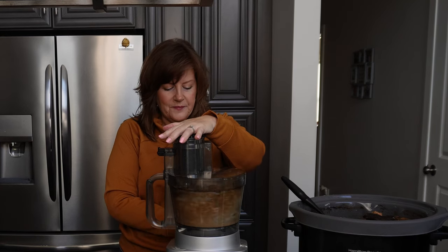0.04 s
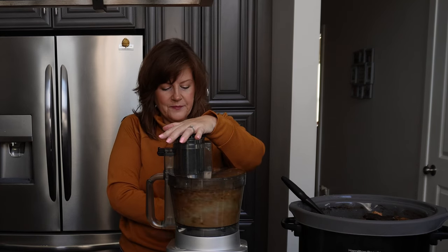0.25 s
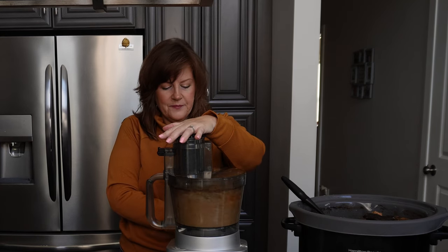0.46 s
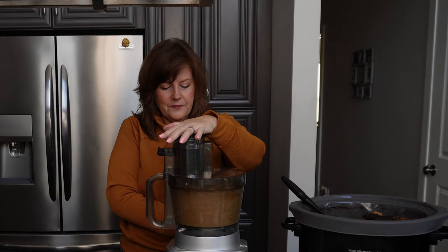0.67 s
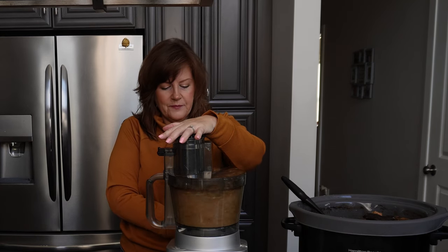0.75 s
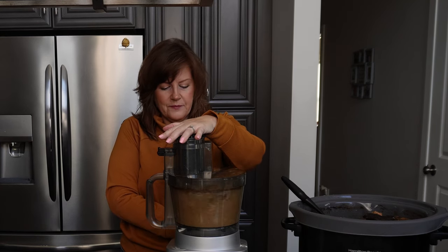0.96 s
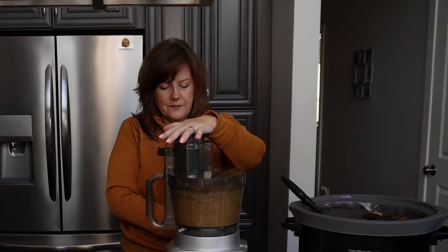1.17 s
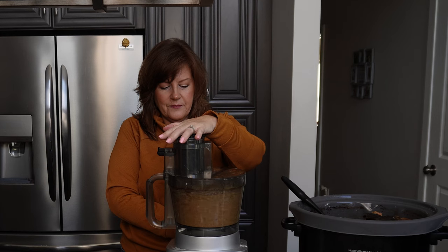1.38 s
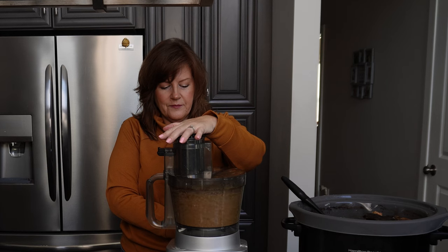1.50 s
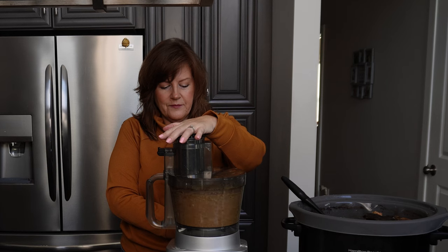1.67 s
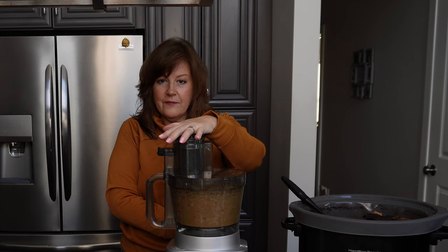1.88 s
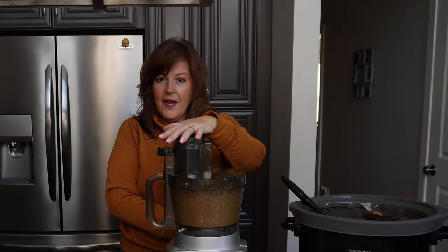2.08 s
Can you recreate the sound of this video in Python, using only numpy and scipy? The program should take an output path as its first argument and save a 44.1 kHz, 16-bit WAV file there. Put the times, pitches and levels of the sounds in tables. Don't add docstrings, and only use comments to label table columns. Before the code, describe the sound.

A food processor coasts faintly downward, then power comes on near 0.17 seconds with a low hum. Its gear whine climbs fast, loudest around 0.5 to 0.7, with rough rushing and rattling food. From then it slides down in pitch and fades, with brief singing tones and a thin bearing squeal. Near 2.05 comes a dull knock, then a bright switch tick at 2.09. Small hard-walled kitchen, fairly close.

```python
import sys
import numpy as np
from scipy import signal
from scipy.fft import rfft, irfft
from scipy.io import wavfile
from scipy.ndimage import uniform_filter1d

SR = 44100
rng = np.random.default_rng(int(sys.argv[2]) if len(sys.argv) > 2 else 0)


def volts(x):
    e = np.asarray(x, float) / 20
    return 10 ** e


def persist_wave(psi):
    counts = np.round(np.clip(psi, -1, 1) * 32767).astype(np.int16)
    wavfile.write(sys.argv[1], SR, np.atleast_2d(counts).T)


N = 94638
POWER_ON_S, HUM_END_S = .165, 1.75

# t/s, level/dB
DRIVE = [(0, -36), (.06, -40), (.15, -40), (.2, -34.5), (.3, -32), (.4, -28), (.5, -24.5), (.67, -25.5),
         (.82, -27.5), (.92, -29.5), (1.0, -30.5), (1.2, -35), (1.55, -40.5), (1.7, -44.5), (1.95, -53),
         (2.15, -53)]
# t/s, f/Hz
MESH_RATE = [
    (0, 895.3),
    (.165, 752.8),
    (.26, 1560),
    (.36, 2000),
    (.45, 2200),
    (.54, 2269),
    (.97, 1499),
    (1.52, 826.4),
    (2.04, 400),
    (2.15, 330),
]
# multiple of the mesh rate, level/dB
MESH_OVERTONES = [(1, -12.5), (2, -19), (3, -18), (4, -21), (5, -23), (6, -26)]
# f/Hz, level/dB (per Hz)
HOUSING_COLOUR = [(60, -51), (200, -23), (620, -21), (1300, -10), (2300, -7.5), (4700, -2), (6200, -12),
                  (10000, -14)]
# f/Hz, width/Hz, lift/dB
HOUSING_PEAKS = [(239, 7.4, 10.5), (330, 40, 4.5), (763, 110, 9.5), (1193, 27, 6), (1490, 58, 12),
                 (2003, 94, 8.5), (2433, 174, 11.5), (2770, 194, 3.5), (2950, 98, 6), (3594, 420, 3.5),
                 (4205, 230, 5), (4904, 650, 3.5), (5410, 74, 2.5), (1620, 260, -1)]
# t/s, f/Hz, half length/s, level/dB (over the drive)
FLARES = [(.01, 4350, 0.042, -10), (.055, 2470, 0.017, -3), (0.135, 1490, 0.038, -10),
          (0.136, 6770, 0.026, -17.5), (.67, 4300, .02, -6), (0.26, 1500, 0.053, -12.5),
          (0.356, 2005, 0.068, -10.5), (0.39, 1490, 0.14, -19), (.65, 2003, 0.082, -14.5),
          (.81, 1995, .03, -15.5), (0.979, 1495, 0.04, -5), (1.01, 3005, 0.066, -9.5),
          (1.1, 2500, 0.067, -15), (1.342, 2005, .04, -9), (1.523, 2500, 0.023, -1.5),
          (1.558, 2415, 0.034, -2), (1.665, 1480, 0.043, -11), (1.88, 2110, 0.061, -5.5),
          (2.036, 2380, 0.015, -10)]
# t/s, lift/dB (negative: a brief dip)
THROWS = [(.263, 0.5), (.432, 2.5), (0.481, -1.5), (0.513, 3.5), (.595, 2.5), (.637, 2.5), (0.67, 3),
          (.812, 3.5), (.955, 1), (1.105, -1.5), (1.195, 4), (1.518, -3), (1.594, 8), (1.745, 0),
          (2.025, 2)]
# f/Hz, level/dB (per Hz)
TICK_COLOUR = [(600, -60), (2000, -20), (4200, -7), (5500, -9), (7000, -5), (9500, 0), (13000, -5),
               (15500, -19)]


def rms_one(x):
    return x / np.sqrt(np.mean(x ** 2) + 1e-20)


def spectrum_hz():
    return np.arange(N // 2 + 1) * SR / N


def at_hz(points, hz):
    table_hz, db = np.transpose(points)
    return np.interp(np.log(hz + 1), np.log(table_hz), db)


def colour(x, db):
    return irfft(rfft(x) * volts(db), N)


def cut(x, hz, kind):
    return signal.sosfilt(signal.butter(2, hz, kind, fs=SR, output="sos"), x)


def shelve_treble(x, hz, loss_db):
    return x - (1 - volts(-loss_db)) * (x - cut(x, hz, "low"))


def drift(rate_hz):
    r = np.exp(-2 * np.pi * rate_hz / SR)
    wander = signal.lfilter([1], [1, -2 * r, r * r], rng.standard_normal(N + SR))
    return rms_one(wander[SR:])


def blurred(phase, blur_hz, steady):
    return (steady + drift(blur_hz)) * np.sin(phase) + drift(blur_hz) * np.cos(phase)


def air_floor():
    return volts(-109) * cut(rng.standard_normal(N), 400, "high")


def kitchen(x):
    t60_s, room_db = .3, -12
    t = np.arange(SR // 2) / SR
    tail = cut(rng.standard_normal(len(t)), 11300, "low") * volts(-60 * t / t60_s) * (t > .004)
    tail *= volts(room_db) / np.sqrt(np.sum(tail ** 2))
    return (x + signal.fftconvolve(x, tail)[:N]) / np.sqrt(1 + volts(2 * room_db))


def windings():
    hum_hz, hum_db, fade_db_per_s = 240.3, -56, 24
    t = np.arange(N) / SR - POWER_ON_S
    switch_on = np.clip(t / 0.0027, 0, 1)
    fade_out = np.clip((HUM_END_S - POWER_ON_S - t) / 0.049, 0, 1)
    level = volts(hum_db - fade_db_per_s * t + 1.2 * drift(10))
    return switch_on * fade_out * level * np.sin(2 * np.pi * hum_hz * t)


def knock():
    knock_s, knock_hz, knock_db, length_s = 2.045, 783, -54.5, 0.0088
    t = np.arange(N) / SR - knock_s
    return volts(knock_db) * np.exp(-(t / length_s) ** 2) * np.sin(2 * np.pi * knock_hz * t)


def tick():
    tick_s, tick_db, tick_t60_s = 2.0872, -40, .004
    second_s, second_db = .0009, -2
    tail_db, hold_s, sag_db_per_s = -54, .062, 290
    bounce_s, bounce_width_s, bounce_db = .024, .005, 3
    dull_hz, dull_db_per_s = 9500, 500
    t = np.arange(N) / SR - tick_s
    after = np.maximum(t, 0)
    bounce = bounce_db * np.exp(-((t - bounce_s) / bounce_width_s) ** 2)
    tail = volts(tail_db - sag_db_per_s * after + bounce + 1.8 * drift(120))
    tail = tail * np.clip((hold_s - t) / .035, 0, 1)
    first = volts(tick_db - 60 * after / tick_t60_s)
    second = (t > second_s) * volts(tick_db + second_db - 60 * (after - second_s) / tick_t60_s)
    snap = (first + second) * rng.choice([-1, 1], N)
    bright = rng.standard_normal(N)
    dull = cut(bright, dull_hz, "low")
    hiss = dull + (bright - dull) * volts(-dull_db_per_s * after)
    burst = (t > 0) * (snap + tail * hiss)
    return cut(colour(burst, 11.6 + at_hz(TICK_COLOUR, spectrum_hz())), 1510, "high")


def rumble(slow):
    shaking = cut(cut(rng.standard_normal(N), 130, "low"), 23, "high")
    return volts(-56.5 - 11 * slow) * rms_one(shaking)


def bearing(slow):
    t = np.arange(N) / SR
    level = volts(-32 + 16 * slow + 2.9 * drift(15))
    main = blurred(2 * np.pi * 6770 * t, 150, 0)
    partner = volts(-4.5) * blurred(2 * np.pi * 6070 * t, 150, 0)
    return level * (main + partner)


def flares():
    t = np.arange(N) / SR
    total = np.zeros(N)
    for at_s, hz, half_s, db in FLARES:
        swell = volts(db) * np.exp(-((t - at_s) / half_s) ** 2)
        total += swell * blurred(2 * np.pi * hz * t, .012 * hz, 0.75)
    return total


def throws():
    rise_s, fall_s = 0.0033, 0.01
    t = np.arange(N) / SR
    lift_db = np.zeros(N)
    for at_s, db in THROWS:
        rise = np.clip((t - at_s) / rise_s, 0, 1)
        lift_db += db * rise * np.exp(-np.maximum(t - at_s, 0) / fall_s)
    return lift_db


def rush():
    grains_per_s, grain_db, spread_db = 6000, -6, 2.5
    born = rng.random(N) < grains_per_s / SR
    grains = born * volts(spread_db * np.minimum(rng.exponential(1, N), 2.6))
    rattle = volts(grain_db) * rms_one(grains * rng.choice([-1, 1], N))
    flutter = volts(.9 * drift(35) + .5 * drift(9))
    return (rng.standard_normal(N) + rattle) * flutter * volts(throws())


def tooth_mesh(mesh_hz, slow):
    phase = 2 * np.pi * np.cumsum(mesh_hz) / SR
    whine = np.zeros(N)
    for multiple, db in MESH_OVERTONES:
        whine += volts(db) * blurred(multiple * phase, 170 * np.sqrt(multiple), 0)
    return volts(-7 * slow) * whine


def housing(x):
    hz = spectrum_hz()
    air_db = 2.5 * np.maximum(hz - 9400, 0) / 1000
    notch_db = 6.5 * np.exp(-((hz - 11870) / 640) ** 2)
    x = colour(x, at_hz(HOUSING_COLOUR, hz) - air_db - notch_db)
    for peak_hz, width_hz, db in HOUSING_PEAKS:
        r = np.exp(-np.pi * width_hz / SR)
        poles = [1, -2 * r * np.cos(2 * np.pi * peak_hz / SR), r * r]
        ringing = signal.lfilter([(1 - r * r) / 2, 0, (r * r - 1) / 2], poles, x)
        x = x + (volts(db) - 1) * ringing
    return x


def slow_dulling(sound, slow):
    sound = shelve_treble(sound, 3370, 4 * slow)
    sound = shelve_treble(sound, 7660, 6 * slow)
    bass = irfft(rfft(sound) / (1 + (spectrum_hz() / 400) ** 6), N)
    return sound - (1 - volts(-33 * slow ** 2.64)) * bass


def gears():
    t = np.arange(N) / SR
    mesh_hz = uniform_filter1d(np.interp(t, *np.transpose(MESH_RATE)), size=1300)
    slow = np.clip(1 - mesh_hz / 2280, 0, 1)
    sound = slow_dulling(housing(rush() + tooth_mesh(mesh_hz, slow)), slow)
    sound = sound / np.sqrt(uniform_filter1d(sound ** 2, size=9000))
    drive = volts(np.interp(t, *np.transpose(DRIVE)) - 0.5)
    return (sound + bearing(slow) + rumble(slow) + flares()) * drive


def scene():
    return (air_floor() + windings() + knock() + tick() + kitchen(gears()))[None]


def roll_off(x):
    return signal.sosfilt(signal.butter(12, 15940, fs=SR, output="sos"), x)


def record(dry):
    top_cut = signal.ellip(10, .3, 70, 15700, fs=SR, output="sos")
    mix = signal.sosfilt(top_cut, dry)
    return roll_off(mix)


dry = scene()
out = record(dry)
persist_wave(out)
```